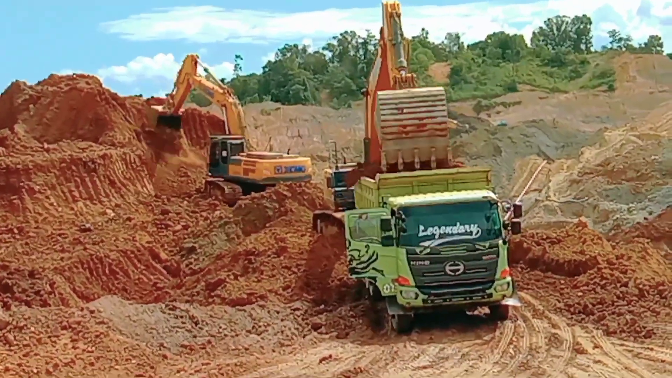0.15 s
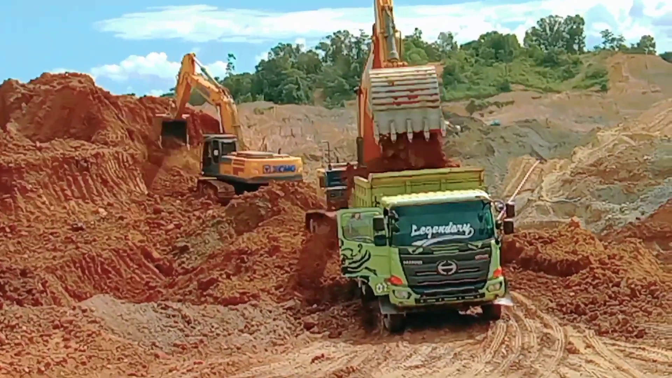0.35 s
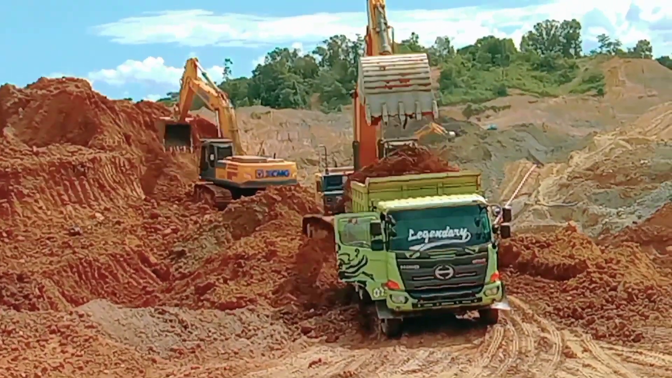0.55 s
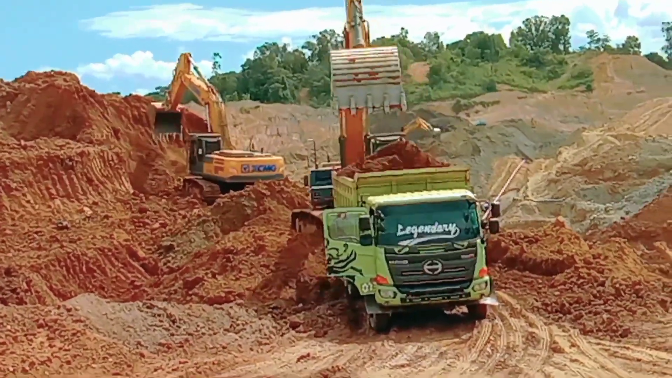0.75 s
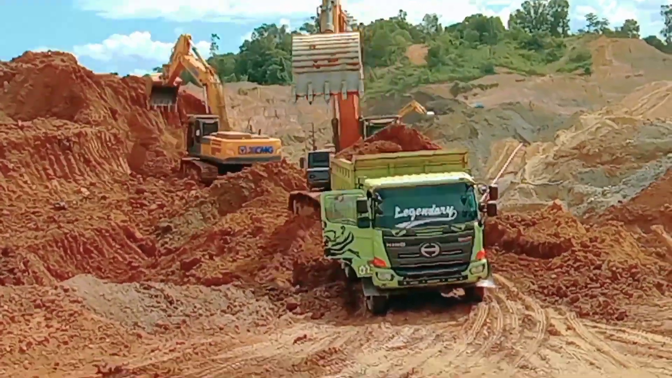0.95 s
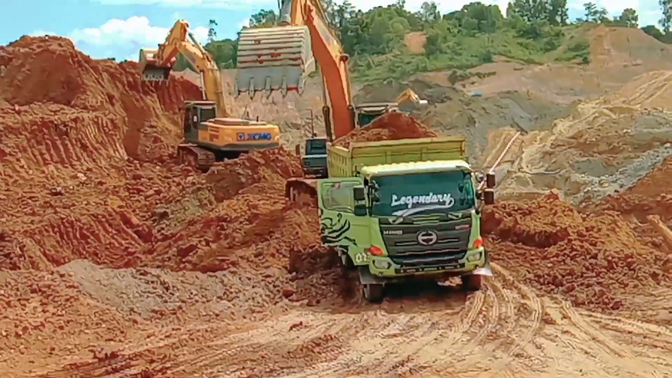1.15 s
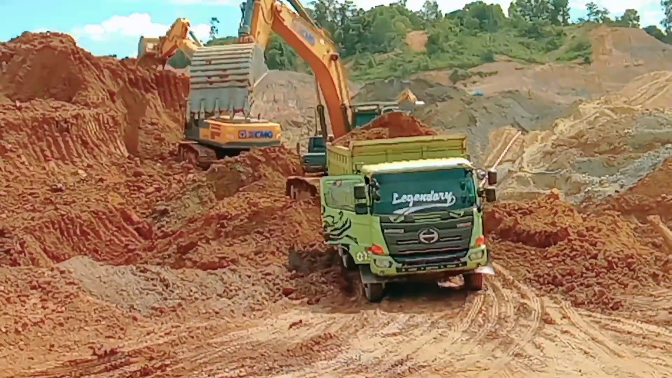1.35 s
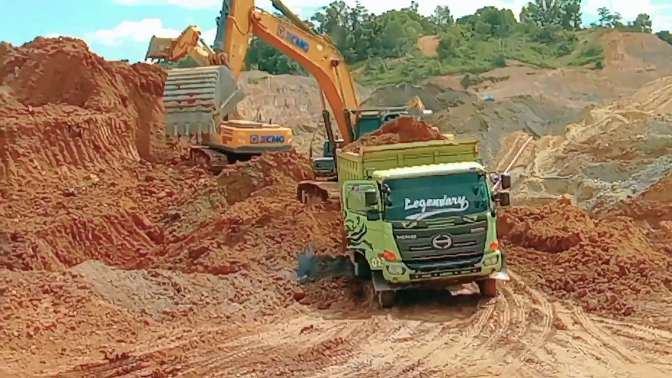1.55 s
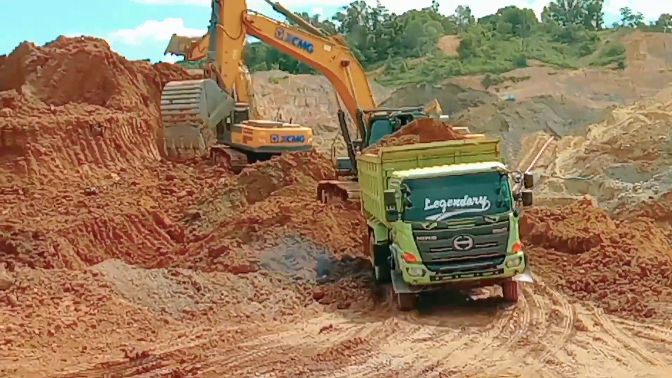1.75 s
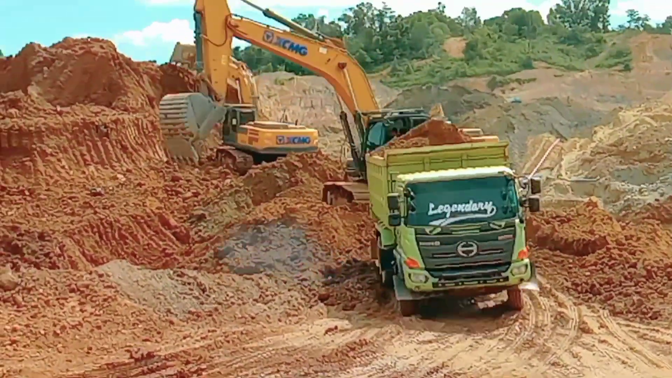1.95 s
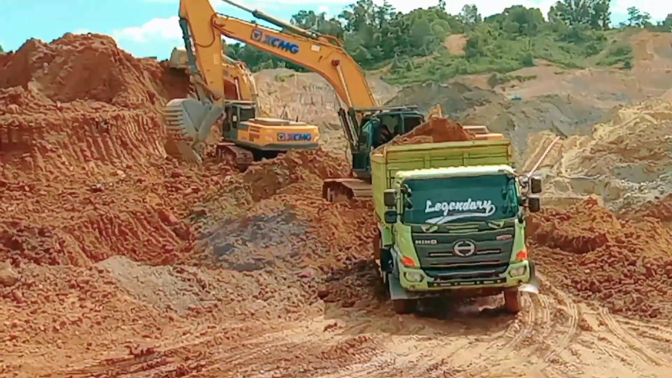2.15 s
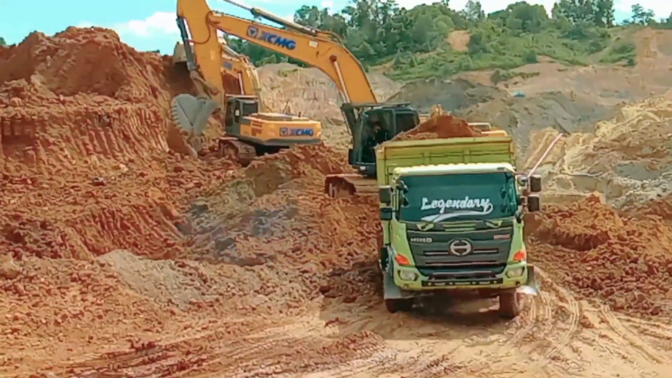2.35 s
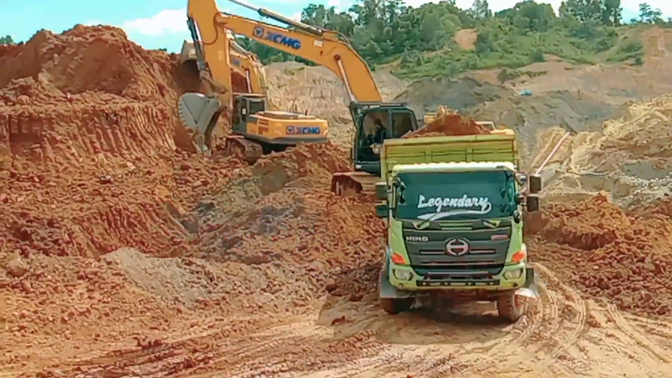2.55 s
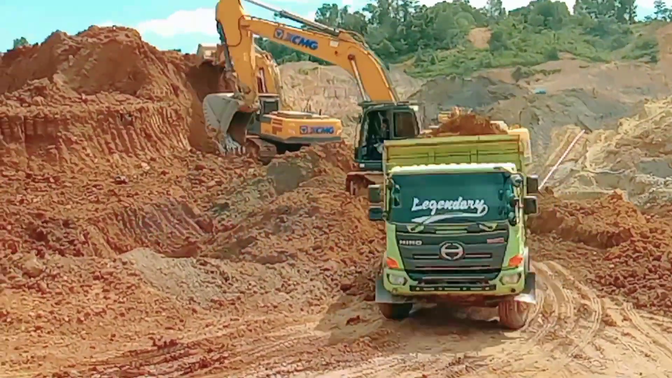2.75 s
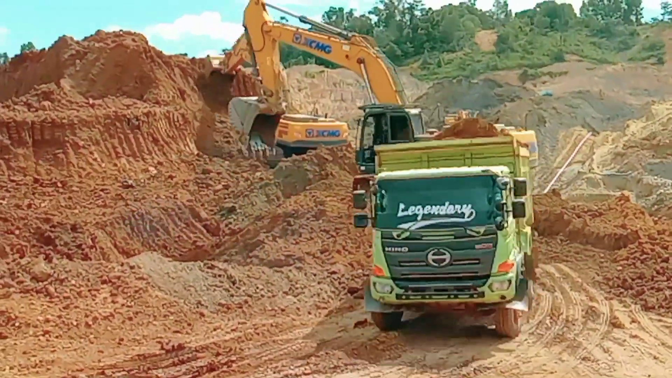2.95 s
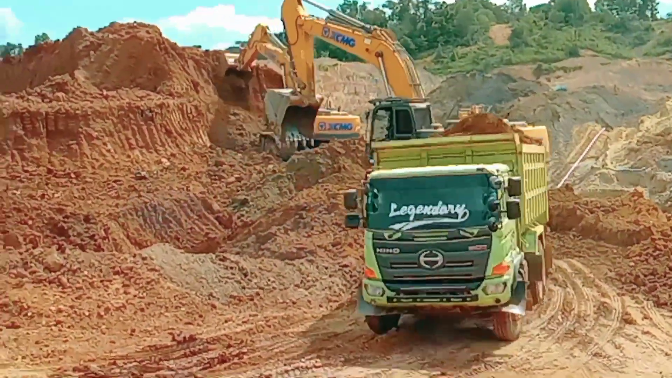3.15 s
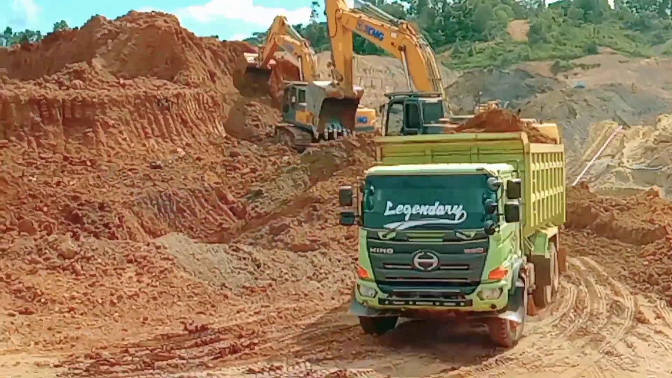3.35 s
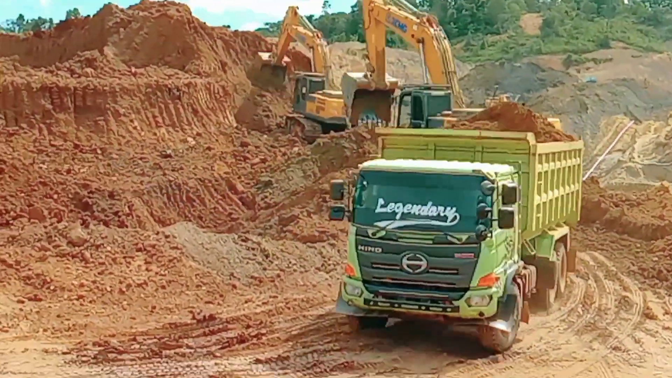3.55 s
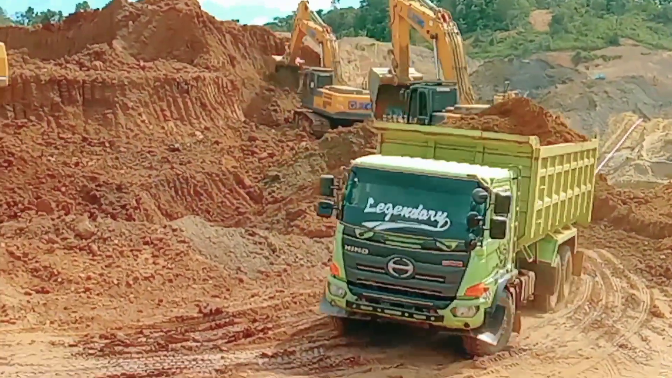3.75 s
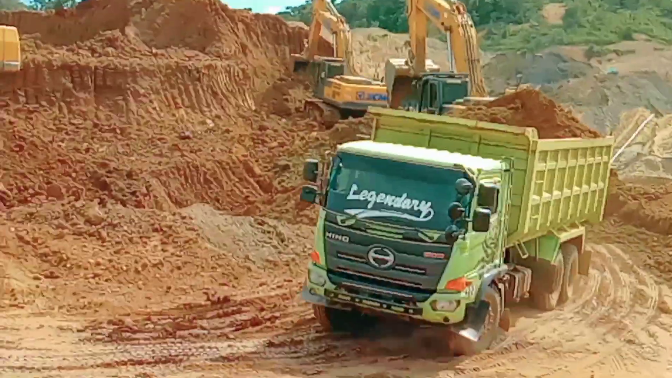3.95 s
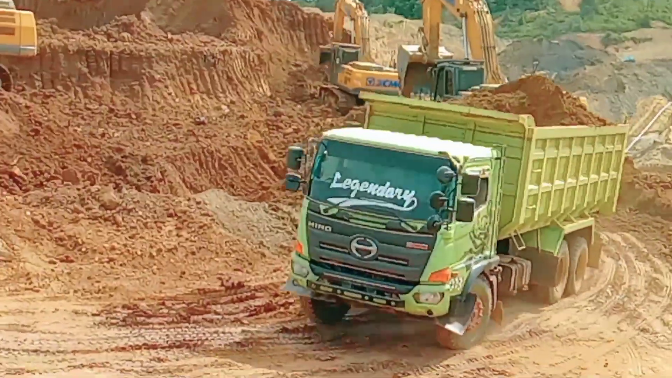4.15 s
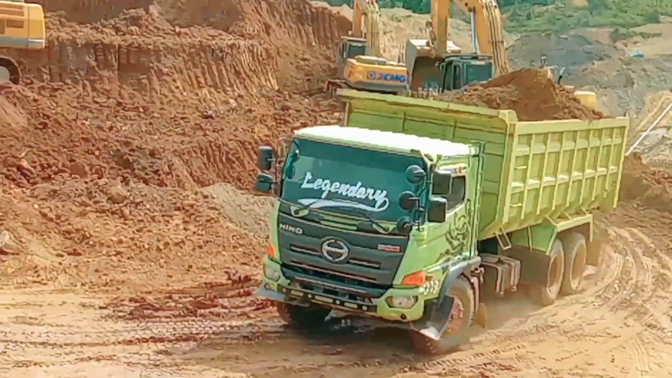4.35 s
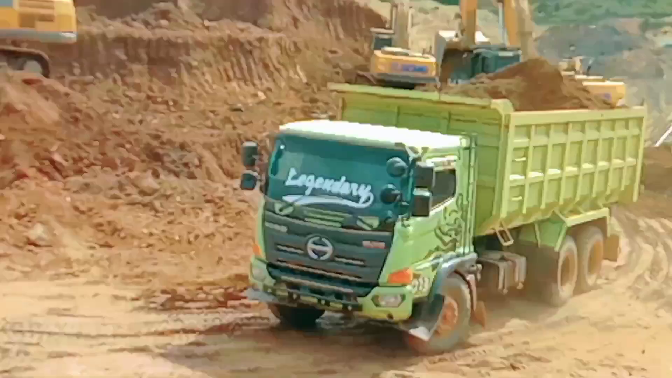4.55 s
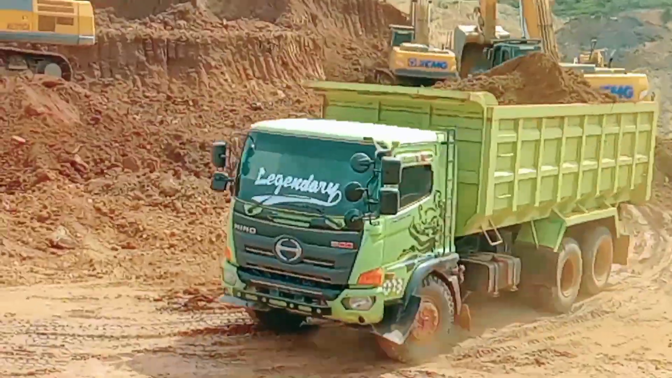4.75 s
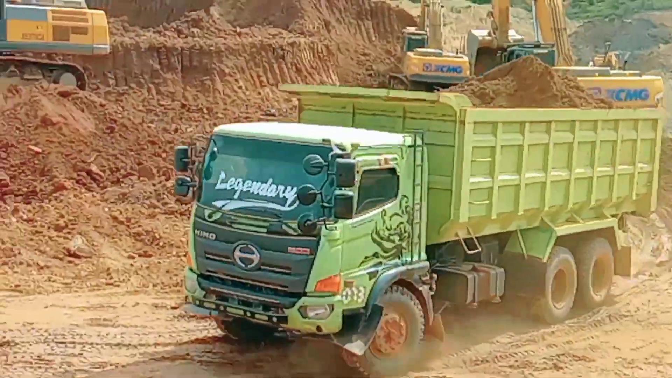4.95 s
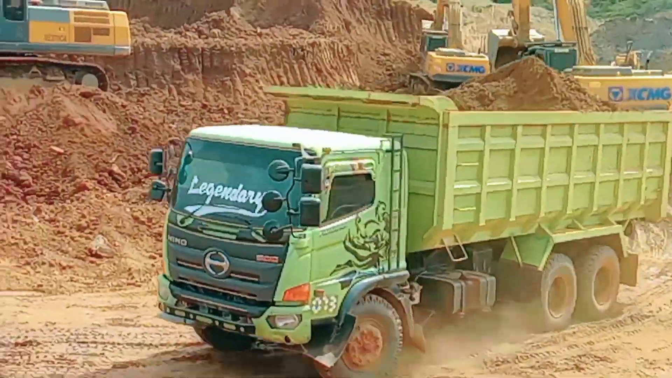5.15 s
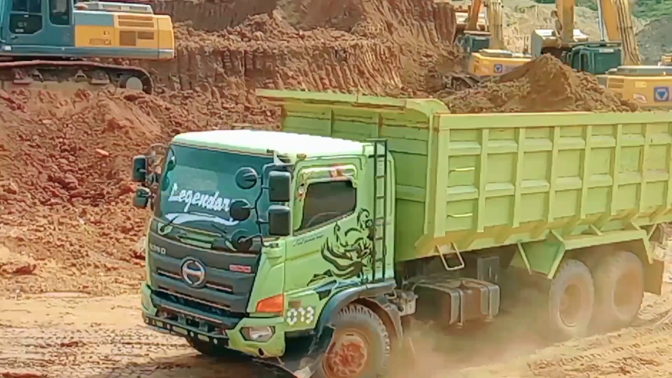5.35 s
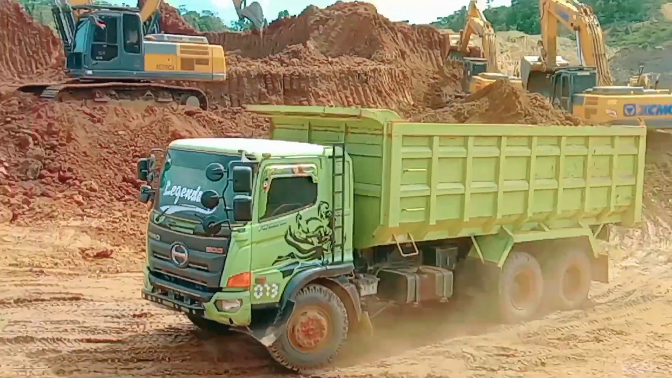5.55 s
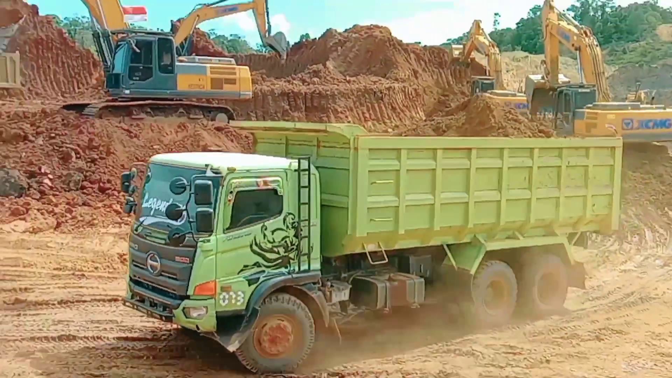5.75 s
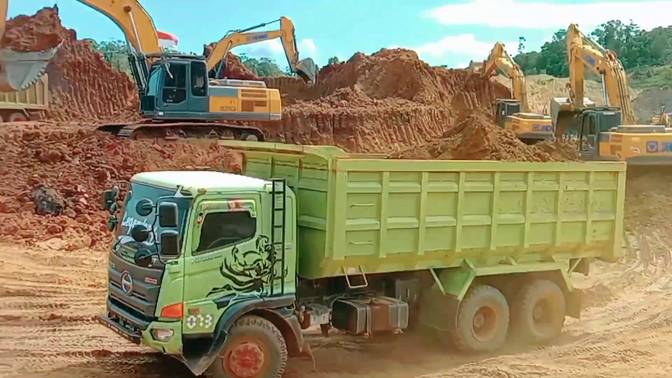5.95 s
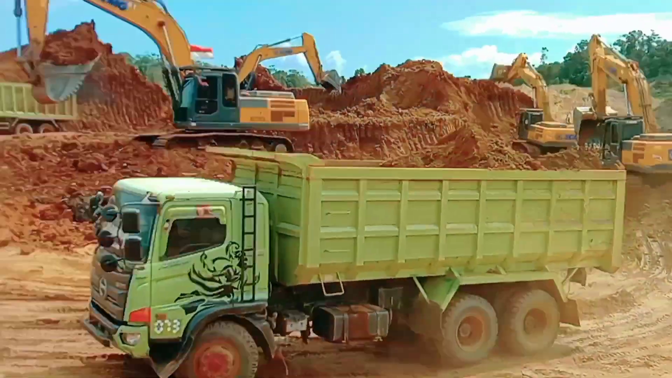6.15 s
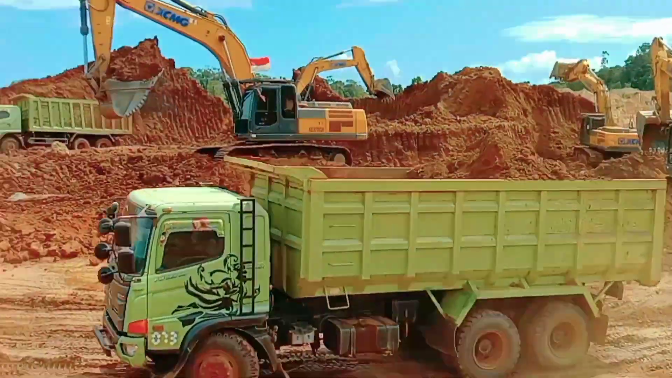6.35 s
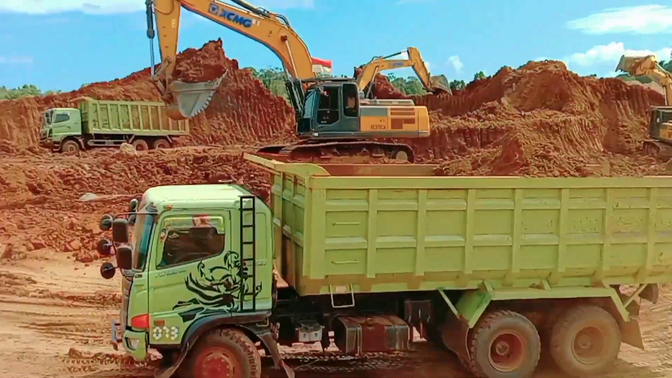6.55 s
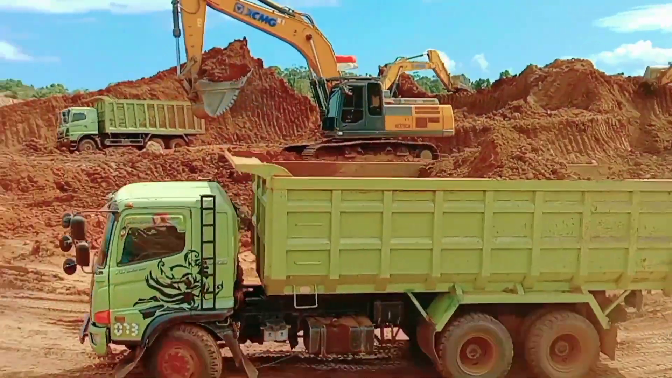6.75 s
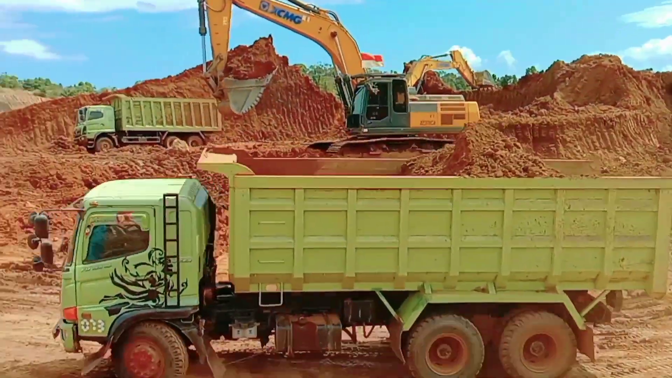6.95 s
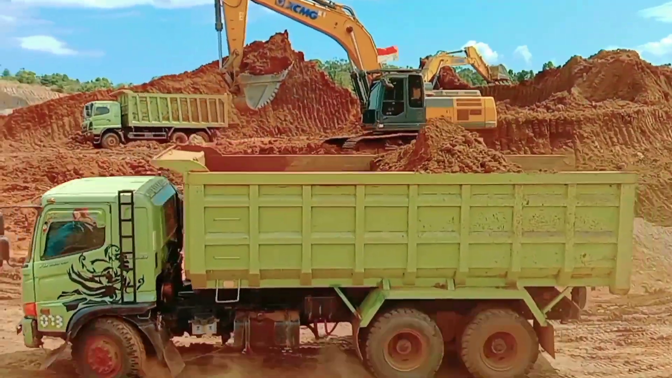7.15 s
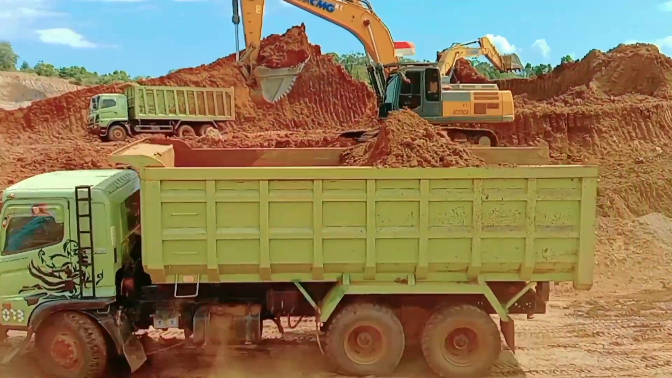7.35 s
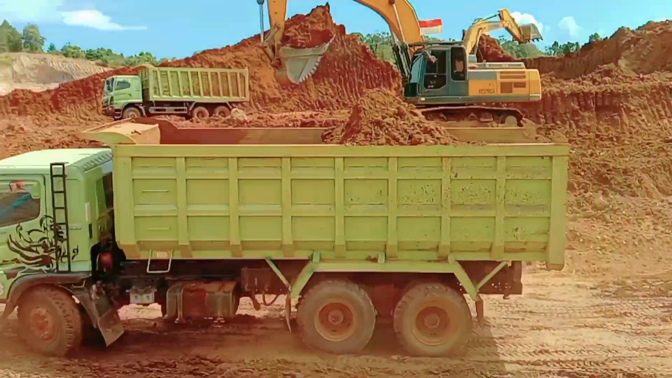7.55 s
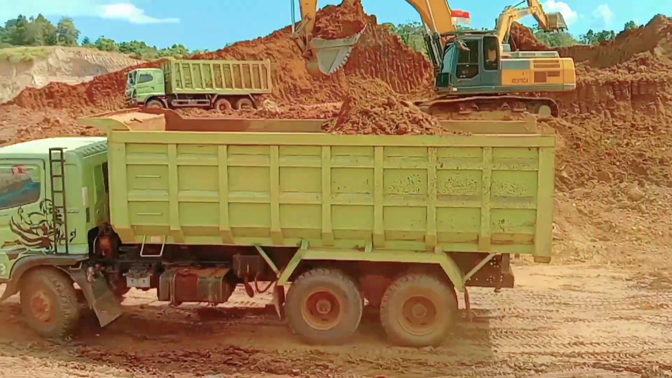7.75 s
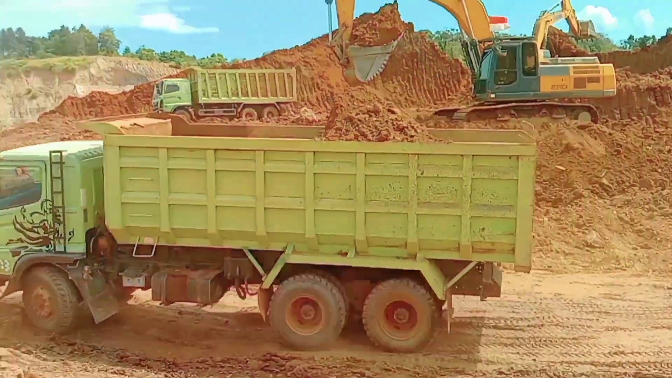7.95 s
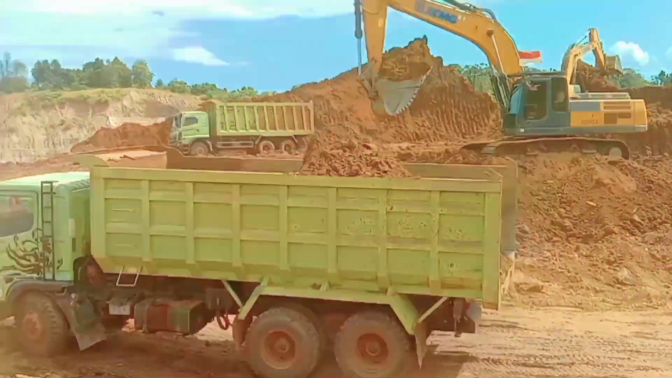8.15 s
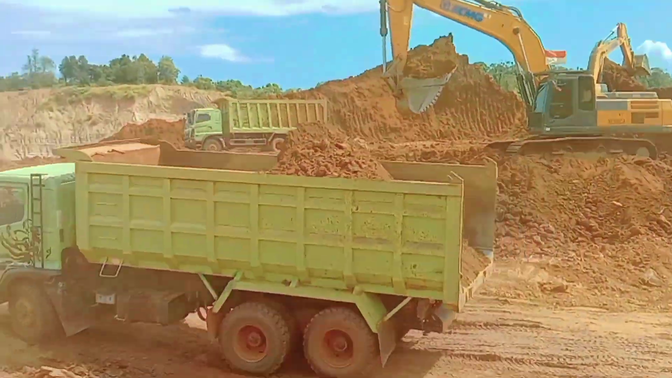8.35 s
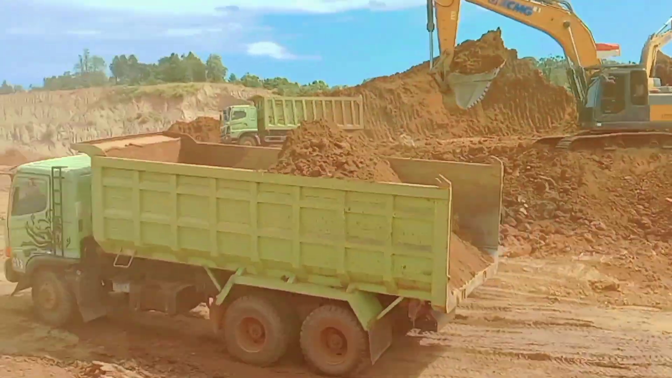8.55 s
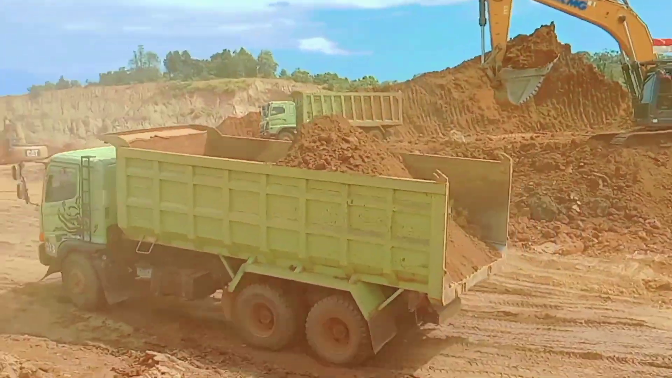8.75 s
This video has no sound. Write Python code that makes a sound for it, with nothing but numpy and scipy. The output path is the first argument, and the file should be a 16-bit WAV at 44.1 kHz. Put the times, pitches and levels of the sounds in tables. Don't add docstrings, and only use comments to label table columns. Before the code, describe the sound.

Earth slides into a truck bed, then a heavy diesel revs, booms and rolls close by, with turbo whine, hissing air and crackling stones.

```python
import sys
import numpy as np
from scipy import signal
from scipy.fft import rfft, irfft, next_fast_len
from scipy.io import wavfile
from scipy.ndimage import uniform_filter1d, map_coordinates

SR = 44100
rng = np.random.default_rng(int(sys.argv[2]) if len(sys.argv) > 2 else 0)


def put_to_file(sound):
    columns = np.atleast_2d(sound).T
    safe = np.clip(columns, -1, 1)
    whole_steps = np.round(safe * 32767)
    wavfile.write(sys.argv[1], SR, whole_steps.astype(np.int16))


def gain_from_db(level_db):
    decades = np.asarray(level_db, float) / 20
    return 10 ** decades


N = 387638

# start_s, level_db
ROAR_LEVEL = [(0, -32.5), (.17, -34), (.4, -28.5), (.9, -27.5), (1.5, -28.5), (1.7, -29), (2.2, -27),
              (3.3, -24), (3.9, -24), (4.5, -21.5), (5, -20.5), (5.8, -20), (6.3, -18.5), (7.3, -20.5),
              (8.79, -20)]
# start_s, side (0 front, 1 flank, 2 tail)
FACING_SIDE = [(0, 0.048), (3.8, 0.3), (5.3, 0.82), (6.8, 1.34), (7.25, 1.4), (7.5, 1.5), (7.9, 1.55),
               (8.25, 1.65), (8.79, 1.77)]
# start_s, roughness (0-1)
ROUGHNESS = [(0, .22), (1.25, .22), (1.42, .8), (1.6, .2), (3.7, .25), (3.9, .55), (4.6, .45), (5.4, .45),
             (5.8, .3), (6.3, .3), (7, .55)]
# start_s, firing_hz, exhaust_level_db, bark_db (upper orders against the exhaust level)
ENGINE_COURSE = [(.29, 57.97, -61.5, -10), (.37, 67.98, -34, -2), (.52, 88, -31.5, 0),
                 (.8, 97.5, -27.5, -4), (1.24, 88, -27, 1), (1.38, 75, -29, 0), (1.6, 62, -28, 4.5),
                 (1.92, 78, -31, 5), (2.9, 94, -24, -4), (3.7, 104.5, -24.5, -9), (3.88, 86.5, -28.5, -47),
                 (4.35, 92.5, -29, -9.5), (4.75, 109.5, -21.5, -32), (5.3, 101.6, -24.5, -22.5),
                 (5.8, 105, -28, 0.5), (6.25, 99, -31, 5.5), (7.15, 113, -27, -9.5),
                 (8.79, 107, -32.5, -28)]
# start_s, length_s, drop_db
PEDAL_LIFTS = [
    (1.3, .24, -4),
    (6.42, .58, -20),
    (8.45, .25, -11),
]
PEDAL_EDGE_S = 0.17


def unit(x):
    return x / np.sqrt(np.mean(np.abs(x) ** 2) + 1e-20)


def along(points, hz):
    f, v = np.transpose(points)
    return np.interp(np.log(hz + 1), np.log(f + 1), v)


def curves(rows, t=None):
    s, *cols = np.transpose(rows)
    if t is None:
        t = np.arange(N) / SR
    return [np.interp(t, s, c) for c in cols]


def spells(rows, t, edge_s=0.04):
    total_db = 0
    for s, length_s, db in rows:
        inside_s = np.minimum(t - s, s + length_s - t)
        total_db = total_db + db * np.clip(inside_s / edge_s + 0.5, 0, 1)
    return total_db


def wobble(rate_hz):
    steps = np.arange(0, N + 32, 32)
    knots = rng.standard_normal(int(N * rate_hz / SR) + 4)
    return np.interp(np.arange(N), steps, map_coordinates(knots, [steps * rate_hz / SR]))


def filtered(x, db_at):
    m = 2 * next_fast_len(N // 2 + 4096)
    cepstrum = irfft(np.log(gain_from_db(db_at(np.fft.rfftfreq(m, 1 / SR)))), m)
    cepstrum[1:m // 2] *= 2
    cepstrum[m // 2 + 1:] = 0
    return irfft(rfft(x, m) * np.exp(rfft(cepstrum)), m)[..., :N]


def narrow(row, width_hz, steady=0):
    s, length_s, from_hz, to_hz, db = row
    u = np.linspace(0, 1, round(length_s * SR))
    pole = np.exp(-np.pi * width_hz * 1.5 / SR)
    white = rng.standard_normal((2, 2 * SR))
    fuzz = signal.lfilter([1], [1, -2 * pole, pole ** 2], white[0] + 1j * white[1])[-len(u):]
    carrier = np.exp(2j * np.pi * np.cumsum(from_hz + (to_hz - from_hz) * u) / SR)
    band = np.real(carrier * unit(steady + unit(fuzz)))
    swell = np.clip(np.minimum(u, 1 - u) / 0.22, 0, 1)
    x = np.zeros(N)
    x[round(s * SR):][:len(u)] = np.sqrt(2) * gain_from_db(db) * band * swell
    return x


def firings():
    firing_hz = curves(ENGINE_COURSE)[0]
    return np.cumsum(firing_hz * (1 + curves(ROUGHNESS)[0] * wobble(25) / 13)) / SR


def engine(t):
    firing_hz, level_db, bark_db = curves(ENGINE_COURSE, t)
    return firing_hz, level_db + spells(PEDAL_LIFTS, t, PEDAL_EDGE_S), bark_db


def hum():
    # start_s, pitch_hz, level_db, unsteadiness (0-1)
    hum_tone = (6.9, 210, -33.5, .018)
    s, hz, db, unsteady = hum_tone
    tone = np.cos(2 * np.pi * np.cumsum(hz * (1 + unsteady * (wobble(6) + wobble(20)))) / SR)
    fade_in = np.clip((np.arange(N) / SR - s) / 0.13, 0, 1)
    return np.sqrt(2) * gain_from_db(db + 2.4 * wobble(8.3)) * tone * fade_in


def hydraulics(count):
    # start_s, length_s, from_hz, to_hz, level_db
    thin_whines = [
        (.3, 0.673, 2460, 2470, -53),
        (1.0, .18, 2410, 2500, -35.5),
        (1.22, .28, 2490, 2660, -40),
        (3.76, .6, 2530, 2650, -38.5),
        (4.2, .85, 2630, 2900, -41),
        (3.6, 1.3, 2860, 3170, -45),
        (2.101, .25, 2400, 2480, -40),
        (.8, .35, 2700, 2780, -48),
    ]
    # start_s, length_s, from_hz, to_hz, level_db
    broad_howls = [
        (1.11, .55, 2880, 3400, -41.5),
        (1.4, .55, 3280, 3320, -36.5),
        (1.65, 1.1, 3090, 2900, -38.5),
        (2.55, 1.1, 3400, 2960, -41),
        (1.47, 0.44, 3860, 3880, -42.5),
        (1.6, .37, 5900, 5900, -52),
        (2.45, 1.1, 2970, 3150, -43),
        (1.65, 1.05, 2660, 2560, -40),
        (.27, .22, 2500, 2700, -45),
    ]
    whines = sum(narrow(row, width_hz=62, steady=0.71) for row in thin_whines)
    howls = sum(narrow(row, width_hz=row[2] ** 2 / 52000) for row in broad_howls)
    beat = 1 + 0.35 * np.cos(2 * np.pi * count)
    return gain_from_db(3.0) * (whines + beat * howls)


def stones():
    # start_s, peak_db (6-11 kHz), top_db (top end against the peak)
    stone_ticks = [(1.9634, -44, -30), (5.0754, -35, -30), (5.1444, -39, -30), (5.2124, -47, -33),
                   (5.4014, -39, -32), (5.9664, -41, -23), (6.4794, -34, -36), (7.1732, -43, -27),
                   (7.2824, -40, -26), (7.7393, -43, -23), (7.8494, -40, -26)]
    # start_s, peak_db (6-11 kHz), top_db (top end against the peak)
    sharp_snaps = [
        (3.2216, -44, 3),
        (5.6027, -33, -28),
        (5.9234, -32, -20),
        (8.7844, -52, -4),
    ]
    x, t = np.zeros((2, N + SR)), np.arange(600) / SR
    for s, db, top_db in [*stone_ticks, *sharp_snaps]:
        decay_db = db + np.array([[0], [top_db]]) - 60 * t / 0.005
        x[:, round(s * SR):][:, :len(t)] += gain_from_db(decay_db) * rng.standard_normal(len(t))
    body_db = [(1000, -14), (4000, 33), (8000, 13), (11000, 5), (13000, -39)]
    top_end_db = [(8000, -30), (11500, 20), (15000, 20)]
    body = filtered(x[0, :N], lambda hz: along(body_db, hz))
    for s, db, _ in sharp_snaps:
        body[round(s * SR):][:4] += gain_from_db(db + 23)
    return body + filtered(x[1, :N], lambda hz: along(top_end_db, hz))


def turbocharger():
    # start_s, length_s, from_hz, to_hz, level_db
    spool_ups = [
        (.6, .6, 5700, 8440, -56),
        (1.196, 0.66, 8950, 12000, -69),
        (3.86, .4, 4150, 5000, -44.5),
        (4.1, 1.35, 4890, 5670, -41.5),
    ]
    return sum(narrow(row, width_hz=420) for row in spool_ups)


def clatter(count):
    # side (0-2), level_db
    level_by_side = [(0, -23), (.3, -26), (1, -10.5), (2, -6)]
    turn = count / 3
    strength = gain_from_db(6 * rng.standard_normal(N // 500).clip(-2, 1.6))[turn.astype(int)]
    gate = 1.3 + strength * np.sin(np.pi * (turn % 1) ** 0.7) ** 2
    jingle = gate * gain_from_db(0.72 * wobble(14)) * rng.standard_normal(N)
    ring = filtered(jingle, lambda hz: -20 * np.log10(1 + ((hz - 4750) / 400) ** 2))
    side_db = curves(level_by_side, curves(FACING_SIDE)[0])[0]
    return gain_from_db(curves(ROAR_LEVEL)[0] + side_db - 3) * unit(ring)


def roar(count):
    # pitch_hz, level_db (per Hz)
    front_view = [(350, 8), (900, -6), (1250, 3), (1620, -7.5), (2000, -2), (2320, -8.5), (2900, -7),
                  (3800, -10), (4600, -20.5), (5500, -11.5), (7500, -19.5), (10000, -39), (12500, -62),
                  (15500, -74)]
    flank_view = [(250, 4.5), (450, 1), (900, 1.5), (1600, 3), (3000, 0.5), (4600, -15), (5800, -22.5),
                  (7500, -26), (10000, -28.5), (12500, -33.5), (15500, -30)]
    tail_view = [(250, 12.5), (450, -7.5), (900, -4), (1550, 5), (2000, -6), (3000, 5.5), (4600, -15.5),
                 (5800, -11), (6800, -22.5), (8000, -49), (10000, -40), (12500, -42), (15500, -41)]
    # start_s, length_s, lift_db
    earth_slides = [
        (.58, 0.11, 4),
        (1.88, 0.095, 4),
        (0, 0.31, 3),
    ]
    # start_s, length_s, drop_db
    digger_lulls = [
        (1.97, .7, -6),
        (3.765, 0.35, -6.5),
        (4.153, 0.865, -10.5),
    ]
    # start_s, length_s, lift_db
    air_bursts = [
        (1.52, .45, 9),
        (2.72, 1.0, 4.5),
        (4.68, 0.676, 9.5),
        (5.36, 2.55, 7),
        (6.45, 0.83, 2),
        (7.65, 0.17, 0.5),
        (8.25, .6, -0.5),
    ]
    firing_beat = np.cos(2 * np.pi * count) * curves([(0, 0.8), (3.7, 0.55), (5, 0.53)])[0]
    beat = 1 + 0.25 * firing_beat + 0.091 * np.cos(2 * np.pi * count / 3)
    hz, t, z = signal.stft(rng.standard_normal(N) * beat, SR, nperseg=512)
    level_db, side = curves(ROAR_LEVEL, t)[0], curves(FACING_SIDE, t)[0]
    firing_hz, pipe_db, bark_db = engine(t)

    slide_db = spells(earth_slides, t)
    throb_db = -15 + 0.17 * (pipe_db + bark_db - level_db + 8) + slide_db + spells(digger_lulls, t)
    drone_db = -8 + 10.5 * np.log2(firing_hz / 100) - 3 * side + slide_db
    hiss_db = -25 + spells(air_bursts, t)
    gusts_db = uniform_filter1d(rng.standard_normal(len(t)), size=6) * 5.5

    shares = [np.clip(1 - abs(side - k), 0, 1) for k in range(3)]
    views = (front_view, flank_view, tail_view)
    colour_db = sum(np.outer(along(view, hz), share) for view, share in zip(views, shares))
    colour_db = colour_db / (sum(shares) + 1e-9)
    throb_band = along([(400, 0.77), (480, 0.028)], hz)
    drone_band = along([(400, 0.16), (480, 0.82), (1000, 1), (1200, 0.27)], hz)
    hiss_band = along([(3600, 0.0061), (5500, 0.79), (10000, 0.59), (13000, 0.59)], hz)
    colour_db += np.outer(throb_band, throb_db + 9)
    colour_db += np.outer(drone_band, drone_db + 10.5)
    colour_db += np.outer(hiss_band, hiss_db + 25.5 + gusts_db)

    patches = uniform_filter1d(rng.standard_normal(z.shape), size=8, axis=0)
    patches = unit(uniform_filter1d(patches, size=10, axis=1))
    colour_db += along([(170, -42), (260, 1.5)], hz)[:, None]
    colour_db += along([(1000, 1.0), (5000, 0.85)], hz)[:, None] * patches
    return signal.istft(z * gain_from_db(colour_db + level_db + 4), SR, nperseg=512)[1][:N]


def exhaust(count):
    # order (multiple of firing rate), level_db (under the 1st order)
    side_orders = [(.3333, -22), (.6667, -18), (1.3333, -18), (1.5, -14), (1.6667, -20), (2.5, -24)]
    # pitch_hz, level_db (per Hz)
    rumble_colour = [(12, -37), (25, -1), (42, -15.5), (60, -0.5), (100, 4), (170, 2.5), (230, -5),
                     (290, -8), (450, -47.5)]
    pipe_hz, pipe_width_hz, pipe_peak_db = 195, 80, 8
    turn_hz, turn_width_hz = 170, 40
    t = np.arange(N) / SR
    firing_hz, level_db, bark_db = engine(t)
    rough = curves(ROUGHNESS)[0]

    def pipe_db(hz):
        return pipe_peak_db / (1 + (2 * (hz - pipe_hz) / pipe_width_hz) ** 2) - pipe_peak_db

    def tone(order, db):
        hz = order * firing_hz
        lag = (order > 1) * np.arctan2(hz * turn_width_hz, turn_hz ** 2 - hz ** 2)
        return np.sqrt(2) * gain_from_db(db + 4.5 * rough * wobble(14)) * np.cos(2 * np.pi * order * count - lag)

    second_db = level_db + bark_db + pipe_db(2 * firing_hz)
    third_db = level_db + 0.46 * bark_db + pipe_db(3 * firing_hz) - 9
    main = tone(1, level_db) + tone(2, second_db) + tone(3, third_db)
    uneven = sum(tone(order, level_db + db - 13.0) for order, db in side_orders)

    rumble_db = -24 + 0.25 * (level_db + 28.5) + 2.5 * curves(FACING_SIDE)[0]
    rumble_db += 4.5 * (rough - 0.4) + 0.046 * spells(PEDAL_LIFTS, t, PEDAL_EDGE_S)
    rumble = filtered(rng.standard_normal(N), lambda hz: along(rumble_colour, hz))
    rumble = unit(rumble * gain_from_db(2.65 * wobble(8.3)))
    return main + uneven + gain_from_db(rumble_db - 7) * rumble


def scene():
    count = firings()
    behind = hum() + hydraulics(count) + stones()
    truck = turbocharger() + clatter(count) + roar(count) + exhaust(count)
    return (behind + truck)[None]


def microphone(dry):
    # centre_hz, width_hz, gain_db
    housing_peaks = [(1261, 123, 10), (1602, 290, -10.5), (1980, 320, 3), (2334, 450, -7), (2648, 590, 8.5),
                     (3156, 410, 5), (4470, 545, -5), (4960, 250, 1), (6310, 640, -11.5), (6900, 600, -0.5),
                     (8050, 1020, -10), (13270, 3760, -17), (15000, 900, -9)]

    def housing_db(hz):
        return sum(db / (1 + (2 * (hz - centre) / width) ** 2) for centre, width, db in housing_peaks)

    return filtered(dry, housing_db) + gain_from_db(-88) * rng.standard_normal(dry.shape)


def band_limit(x):
    return signal.sosfilt(signal.butter(12, 16850, fs=SR, output="sos"), x)


def record(dry):
    mix = filtered(microphone(dry), lambda hz: -70.0 * (hz > 15520))
    return band_limit(mix)


dry = scene()
out = record(dry)
put_to_file(out)
```